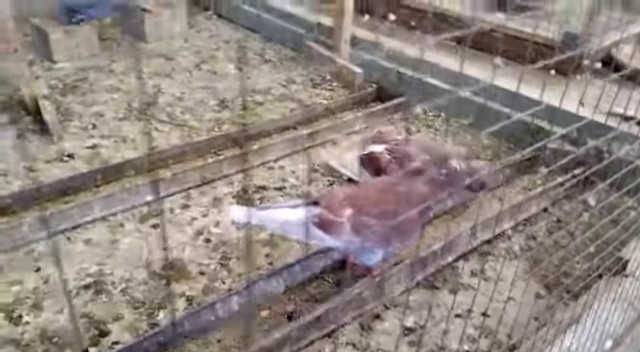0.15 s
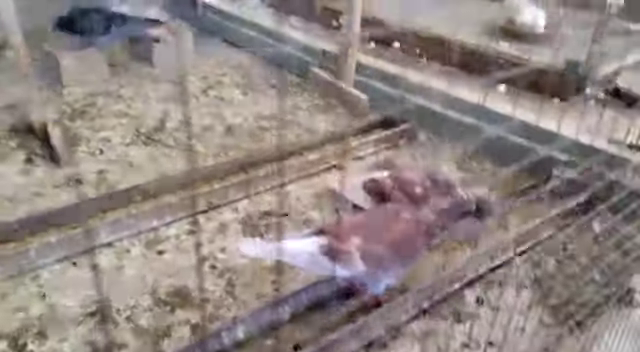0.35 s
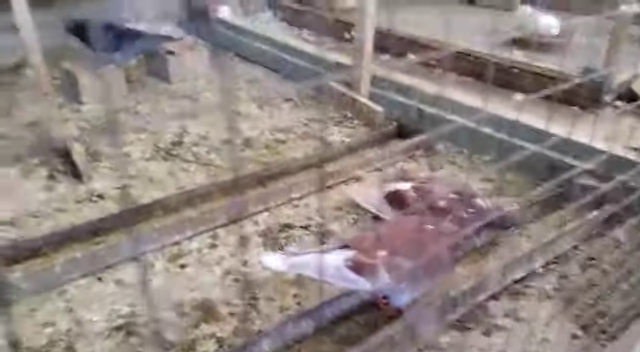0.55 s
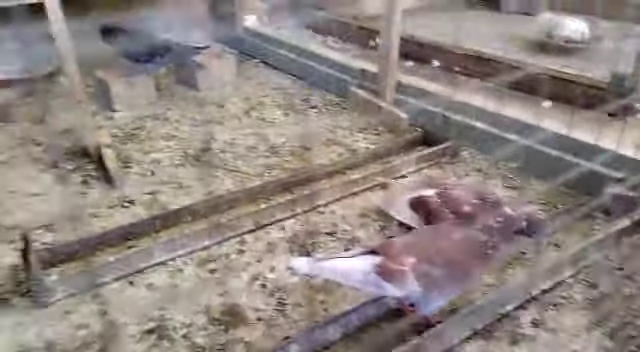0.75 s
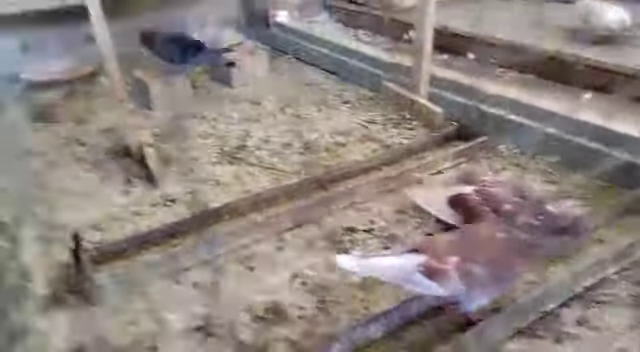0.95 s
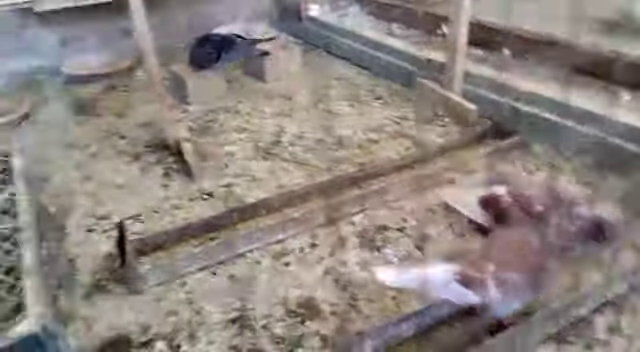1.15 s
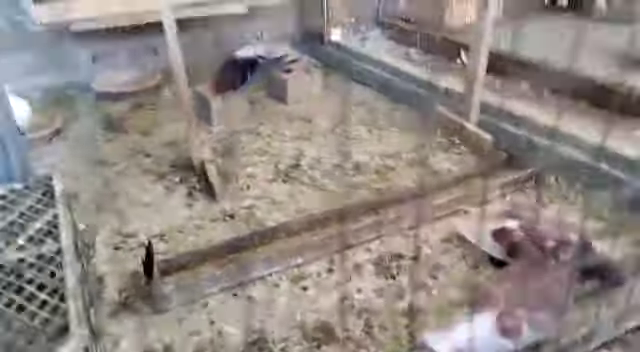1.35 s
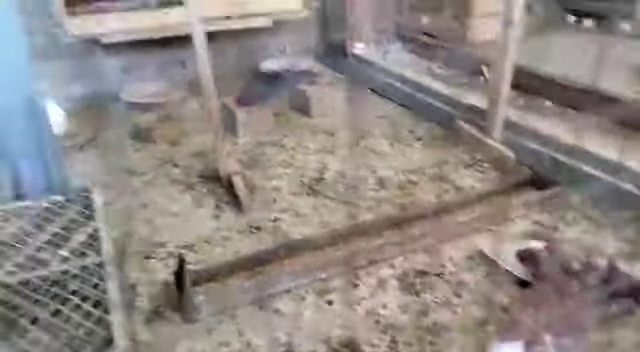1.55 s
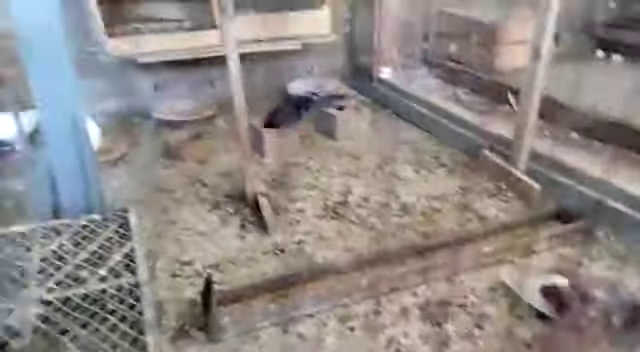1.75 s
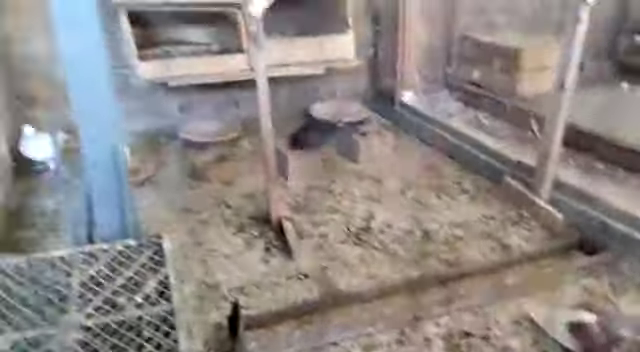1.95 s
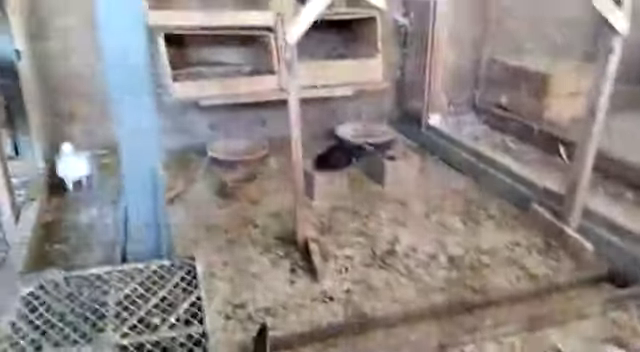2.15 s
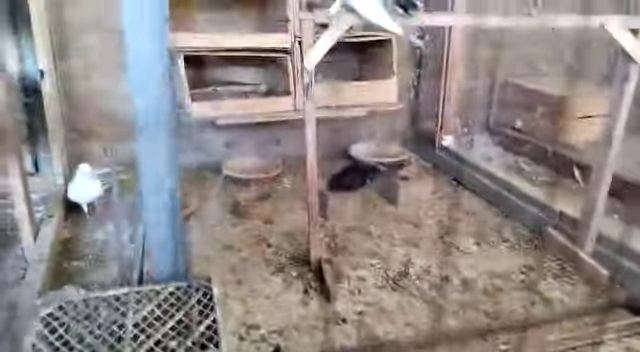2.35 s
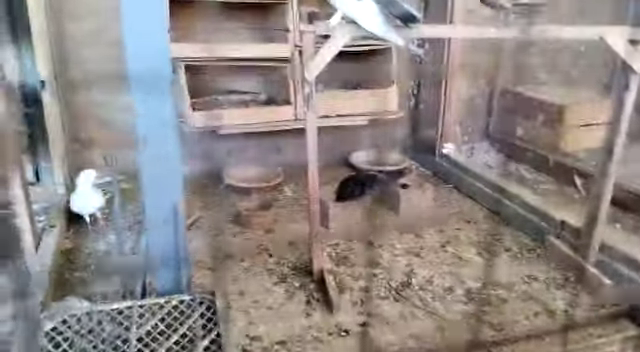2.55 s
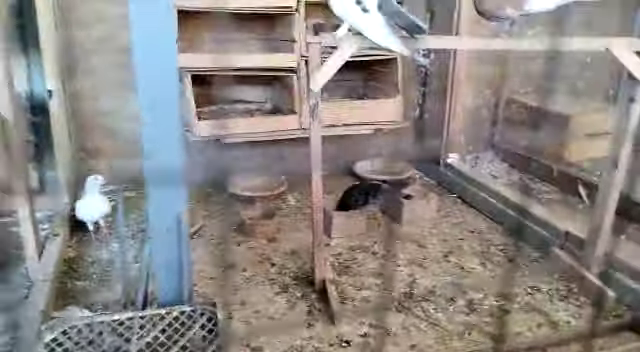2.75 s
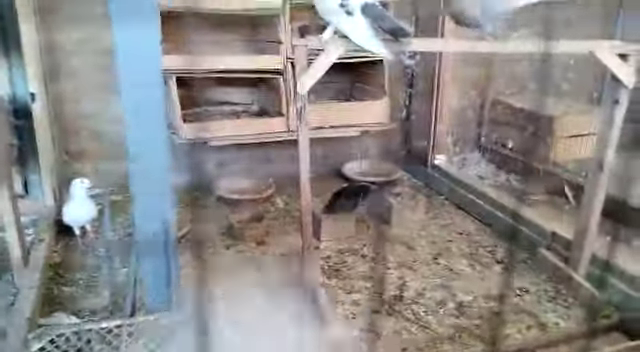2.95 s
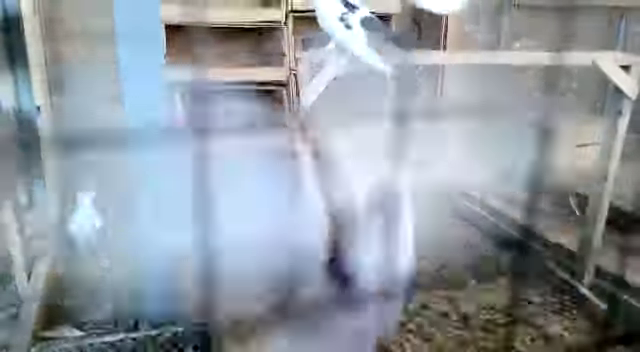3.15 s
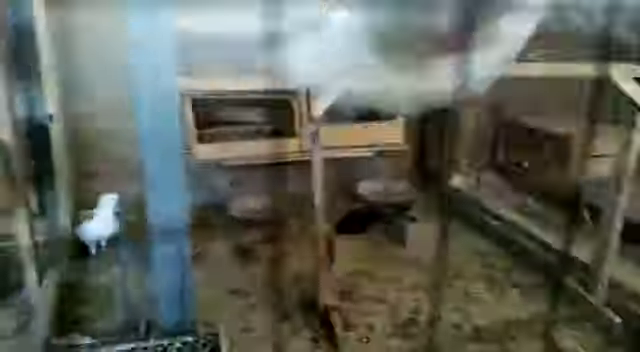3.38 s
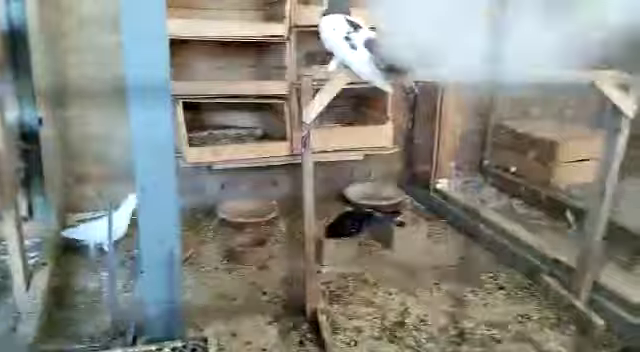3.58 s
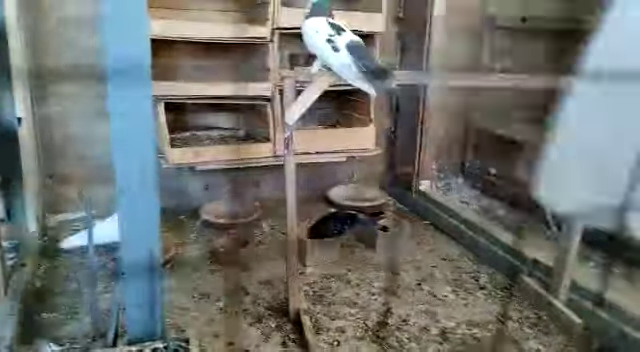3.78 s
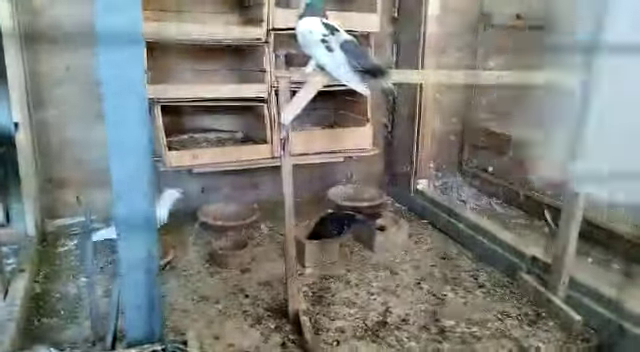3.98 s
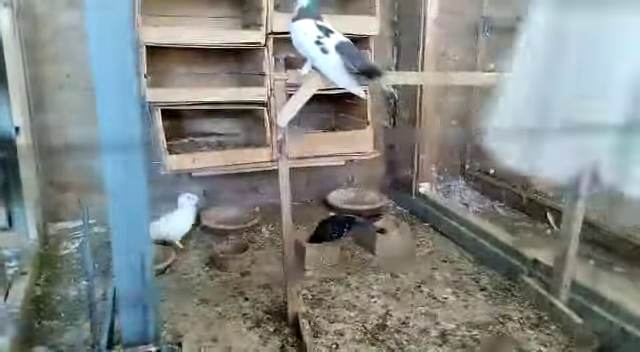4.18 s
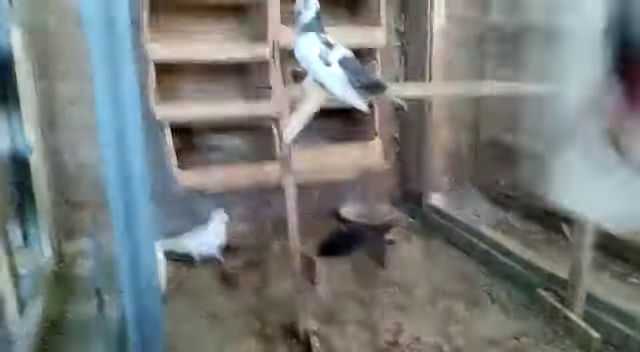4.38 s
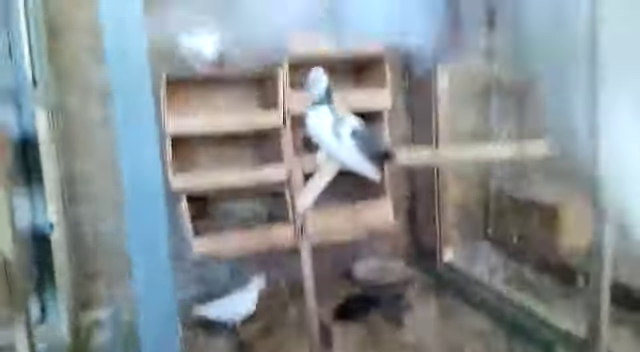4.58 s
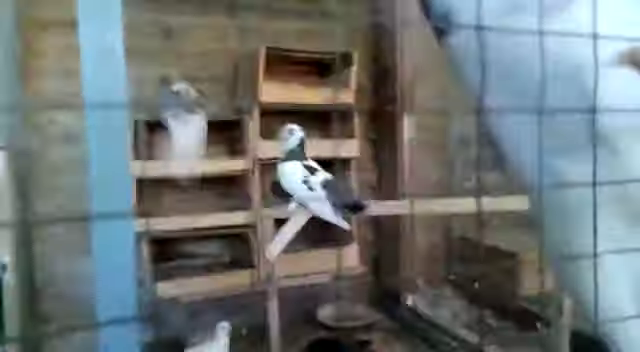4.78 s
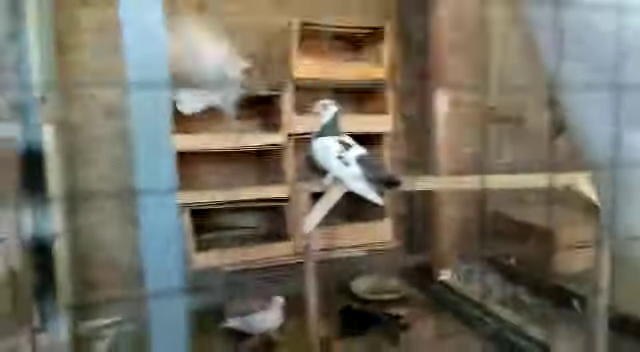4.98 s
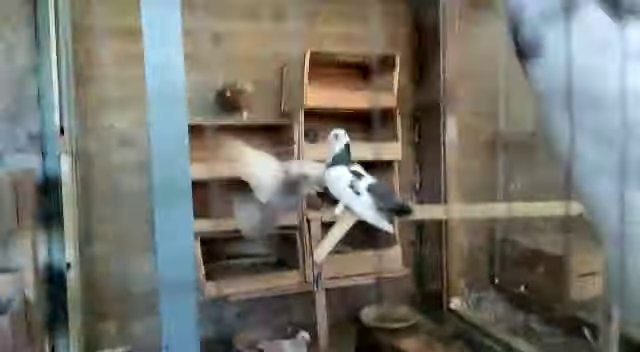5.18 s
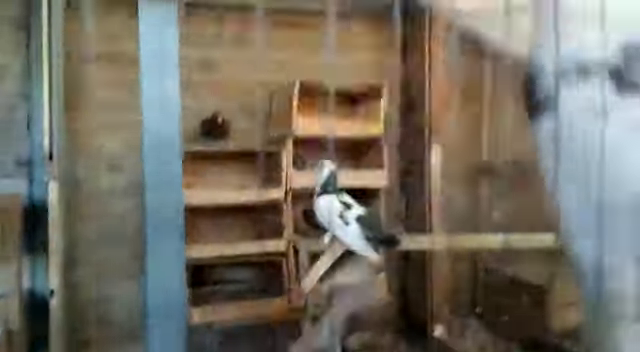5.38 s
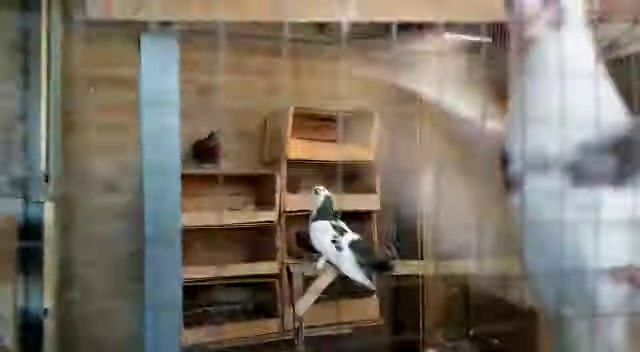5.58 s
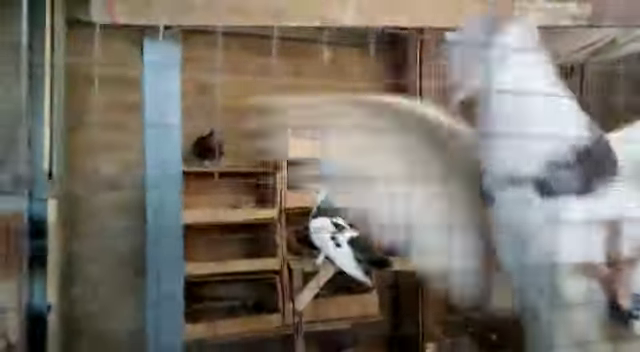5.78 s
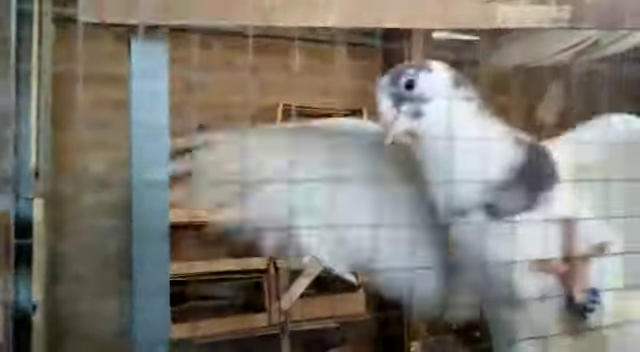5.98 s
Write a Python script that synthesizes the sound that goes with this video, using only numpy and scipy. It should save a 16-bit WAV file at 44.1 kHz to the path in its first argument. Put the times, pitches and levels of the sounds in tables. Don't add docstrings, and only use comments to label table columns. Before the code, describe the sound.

Pigeons patter and peck on gritty boards before one flaps hard at the wire very close by, slows, then lands two last sharp claps.

```python
import sys
import numpy as np
from scipy import signal
from scipy.fft import rfft, irfft
from scipy.io import wavfile
from scipy.ndimage import uniform_filter1d

SR = 44100
rng = np.random.default_rng(int(sys.argv[2]) if len(sys.argv) > 2 else 0)


def makeup_ratio(level_db):
    decades = np.asarray(level_db, float) / 20
    return 10 ** decades


def bounce(signal):
    frames = np.transpose(np.atleast_2d(signal))
    limited = np.clip(frames, -1, 1)
    pcm = np.round(limited * 32767).astype(np.int16)
    wavfile.write(sys.argv[1], SR, pcm)


N = 265923

# t/s, level/dB, distance/m
BUSTLE = [(0.0, -50, 3), (0.17, -51, 1.8), (1.33, -56, 14), (1.64, -54, 0.77), (2.97, -56.5, 3.6),
          (3.17, -46, 1.2), (3.29, -29, 2.5), (3.39, -30, 2.6), (3.66, -38, 1.5), (3.81, -37, 4.8),
          (4.03, -41.5, 2.5), (4.59, -38.5, 4.1), (4.8, -39, 2.1), (5.12, -39, 2.5), (5.41, -43, 3.3),
          (5.54, -33.5, 3.8), (5.78, -47, 1.6), (6.03, -48, 1.4)]


def curve(table):
    s, *columns = np.transpose(table)
    return [np.interp(np.arange(N) / SR, s, c) for c in columns]


def unit(x):
    return x / np.sqrt(np.mean(x ** 2))


def response(points, size=4096):
    hz, db = np.transpose(points)
    grid = np.maximum(np.arange(size // 2 + 1) * SR / size, 1)
    cepstrum = irfft(np.interp(np.log(grid), np.log(hz), db) * np.log(10) / 20)
    cepstrum[1:size // 2] *= 2
    cepstrum[size // 2 + 1:] = 0
    return irfft(np.exp(rfft(cepstrum)))


def band(x, lo_hz, hi_hz, order=3):
    return signal.sosfilt(signal.butter(order, [lo_hz, hi_hz], "band", fs=SR, output="sos"), x)


def walk(rate):
    k = int(SR / rate)
    held = np.repeat(rng.standard_normal(N // k + 1), k)
    return unit(uniform_filter1d(uniform_filter1d(held, k), k)[:N])


def crackle(spread_db):
    sizes = makeup_ratio(spread_db * rng.exponential(size=N).clip(0, 5))
    return unit(rng.standard_normal(N) * sizes)


def voiced(source, body, middle, edge):
    # f/Hz, level/dB
    mic_port = [(180, -12.5), (300, -10.5), (462, -13.5), (602, -9), (1230, -9.5), (1580, -6.5),
                (2630, -4.5), (3700, -3), (4330, -8.5), (5050, -1.5), (7870, 4.5), (10100, -3.5),
                (12100, -16), (15800, -23.5)]
    early = 256
    port = rfft(np.roll(response(mic_port), early))
    octave = np.log2(np.linspace(1, SR / 2, len(port)))
    above_body, above_edge = (1 / (1 + np.exp(-9 * (octave - np.log2(hz)))) for hz in (4500, 11000))
    shares = (1 - above_body, above_body - above_edge, above_edge)
    out = 0
    for env, share in zip((body, middle, edge), shares):
        h = irfft(port * share)
        h = h / np.sqrt(np.sum(h ** 2))
        out = out + signal.fftconvolve(source * env, h)[early:N + early]
    return out


def wing_claps():
    # t/s, peak/dB, crackle length/ms, distance/m, body share/dB
    clap_table = [(1.724, -15.5, 5.1, 0.13, -14), (1.742, -24.5, 6.4, 1.1, -5.5),
                  (3.1492, -6, 2.6, 0.2, -7.5), (3.26, -1, 4.7, 0.64, -4), (3.3759, -3.5, 2, 0.85, -5),
                  (3.4918, -11, 2.7, 1.4, -8), (3.5465, -10.5, 2.05, 0.23, -4), (4.0018, -25, 4, 0.27, -21),
                  (4.087, -26.5, 10, 2.3, -9.5), (4.2525, -21, 8.1, 1.4, -6), (4.3899, -17, 8, 1.3, -11),
                  (4.4358, -19.5, 3, 2.5, -23), (4.669, -18.5, 11, 1.9, -11), (4.805, -19.5, 5.9, 2.4, -10),
                  (4.828, -24, 6.8, 0.5, 0.5), (4.947, -17, 11, 1.9, -9), (5.1183, -36, 3.6, 9.5, -7.5),
                  (5.1756, -17, 4.5, 1.3, -12), (5.4, -25, 3.7, 3.7, -5), (5.523, 1.5, 3.9, 1.1, -9),
                  (5.6442, 2.5, 3.9, 1.07, -9.5)]
    edge_db = -9.5
    return [(*row, edge_db) for row in clap_table]


def quill_catches():
    # t/s, peak/dB, distance/m
    catch_table = [(3.123, -12.5, 1.1), (3.3168, -3, 0.12), (3.5132, -4.5, 0.4), (3.5376, 2, 0.17),
                   (3.6806, -7, 0.41), (3.7774, -12, 1.6), (4.1594, -20, 1.1), (4.4525, -12, 2),
                   (4.7632, -20, 0.65), (5.865, -24.5, 0.88), (5.878, -33, 0.49)]
    body_db, edge_db = -15, -22
    return [(s, db, 0.8, m, body_db, edge_db) for s, db, m in catch_table]


def pecks():
    # t/s, peak/dB
    peck_table = [
        (1.8574, -25.5),
        (1.932, -26.5),
        (2.7367, -24.5),
        (3.4287, -16),
    ]
    length_ms, distance_m, body_db, edge_db = 0.8, 0.58, -13, -8
    return [(s, db, length_ms, distance_m, body_db, edge_db) for s, db in peck_table]


def claw_ticks():
    # t/s, peak/dB, body share/dB
    tick_table = [(0.194, -39, -1), (0.4096, -24.5, -5.5), (0.6916, -38, -9), (0.815, -26.5, -30),
                  (0.832, -31, -9), (0.9605, -38, -10), (1.052, -33, -20), (1.0635, -32.5, -8),
                  (1.313, -33, -9), (1.551, -35, -25), (1.68, -33, -8), (1.703, -31, -8), (2.043, -38, -28),
                  (2.228, -33, -25), (1.955, -36, -20), (2.2166, -27.5, -10), (2.2626, -33, -17),
                  (2.314, -31, -4), (2.358, -30, -9), (2.4964, -25, -12), (2.578, -29, -22),
                  (2.8904, -23, -14), (2.908, -31, -15), (2.931, -31.5, -25), (3.0105, -28.5, -14),
                  (3.03, -39, -13), (2.785, -36, -4), (2.808, -40, -6), (3.045, -36, -2), (2.6, -37, -4)]
    length_ms, distance_m, edge_db = 0.8, 0.57, -13
    return [(s, db, length_ms, distance_m, body_db, edge_db) for s, db, body_db in tick_table]


def contacts():
    room_at_1m_db, dull_db_per_doubling = -16.5, 2
    brightens = 0.15
    t60_s = np.array([[0.29], [0.29 * 0.85], [0.17]])
    direct, room = np.zeros((3, N)), np.zeros((3, N))
    t = np.arange(SR // 2) / SR
    for s, db, ms, m, body_db, edge_db in wing_claps() + pecks() + claw_ticks() + quill_catches():
        room_db = room_at_1m_db + 20 * np.log10(m)
        edge_db = edge_db - dull_db_per_doubling * np.log2(m) + brightens * max(db + 8, 0)
        share = makeup_ratio(db + np.array([[body_db], [0], [edge_db]]))
        i = int(s * SR)
        n = min(len(t), N - i)
        u = t[:n] / (ms / 1000)
        direct[:, i:i + n] += share ** 2 * (1 - np.exp(-u / 0.7)) * np.exp(-2 * u ** 0.68)
        tail = share * makeup_ratio(room_db - 60 * t[:n] / t60_s)
        room[:, i:i + n] += tail ** 2 * (1 - np.exp(-t[:n] / 0.0037))
    barbs = rng.choice([-1., 1.], N) * makeup_ratio(0.35 * walk(900))
    scatter = crackle(1.3)
    return makeup_ratio(-4.0) * (voiced(barbs, *np.sqrt(direct)) + voiced(scatter, *np.sqrt(room)))


def barb_snaps():
    # t/s, peak/dB
    snap_table = [(3.1497, -4.5), (3.235, -20), (3.2605, -9), (3.3172, -2.5), (3.3768, -4), (3.4305, -5),
                  (3.465, -12.5), (3.655, -17), (3.669, -13), (3.6705, -7), (3.672, -8), (3.6738, -8),
                  (3.6768, -3.5), (3.6808, 0.5), (3.6835, -14), (3.686, -12), (3.689, -15), (3.4922, -12),
                  (3.494, -13), (3.4955, -14), (3.5425, -10), (3.548, -7), (3.5495, -10), (3.552, -15),
                  (3.761, -26), (3.7745, -10.5), (3.78, -16), (3.846, -20), (4.0205, -21), (4.1416, -25),
                  (4.1625, -16), (4.211, -20), (4.282, -23), (4.3192, -32), (4.3471, -27), (4.4555, -5.5),
                  (4.5035, -15), (4.545, -17), (4.559, -17), (4.57, -21), (4.64, -22), (4.7645, -17),
                  (4.6766, -14), (4.2011, -21), (3.9278, -27), (4.9505, -11), (4.9074, -23), (4.9233, -23),
                  (4.955, -5), (4.974, -8), (5.1618, -26), (5.292, -27), (5.3264, -33), (5.5225, -6),
                  (5.5245, -4), (5.5258, -2), (5.5498, -10), (5.551, -14)]
    body_db, edge_db = -13, -5
    brightens = 0.5
    click = np.zeros((3, N))
    for (s, db), (sign, lag) in zip(snap_table, rng.random((len(snap_table), 2))):
        size = np.sign(sign - 0.5) * makeup_ratio(db + 4.5 + np.array([body_db, 0, edge_db + brightens * db]))
        echo_s = 0.0002 + 0.0006 * lag
        click[:, int(s * SR)] += size
        click[:, int((s + echo_s) * SR)] += 0.46 * size
    return voiced(0.9, *click)


def rings():
    # t/s, peak/dB, f/Hz, t60/ms
    ring_table = [(3.262, -18, 2420, 47), (3.376, -18.5, 3080, 38), (3.3765, -21, 2090, 26),
                  (3.3765, -15, 3890, 27), (3.465, -26.5, 3400, 60), (4.748, -39, 3320, 70),
                  (4.772, -38, 3550, 50), (4.762, -34, 3300, 44), (4.802, -38, 3500, 36),
                  (4.826, -30, 3240, 70), (4.842, -36, 3100, 60), (4.83, -31, 7000, 99),
                  (4.9, -42, 3180, 60), (4.925, -31, 3030, 50), (5.175, -35, 1600, 40),
                  (5.178, -41, 2960, 60), (5.215, -50, 3600, 120), (5.325, -39, 2400, 54),
                  (5.345, -52, 3420, 90), (5.397, -37, 1134, 87), (5.345, -42, 722, 200),
                  (5.522, -31, 1150, 120), (5.42, -41, 3970, 92), (5.44, -33.5, 608, 110),
                  (5.5223, -19, 1593, 59), (5.5228, -11.5, 3980, 35), (5.524, -13, 10200, 40),
                  (5.525, -26, 2820, 94), (5.6455, -16, 1640, 45), (5.6447, -18.5, 2414, 46),
                  (5.6445, -9, 3560, 32), (2.59, -58, 2760, 80), (.727, -54, 1980, 45),
                  (.782, -47.5, 950, 40), (0.003, -48, 1920, 70), (.288, -58, 3200, 60),
                  (.374, -53, 3200, 50), (.325, -57, 910, 66), (1.567, -49, 967, 130),
                  (4.255, -41, 3200, 60), (5.72, -36.5, 293, 130), (5.795, -51, 850, 120),
                  (5.86, -50, 900, 70), (5.925, -49, 780, 110), (5.986, -57, 880, 70)]
    swell_ms = 1.2
    out, t = np.zeros(N + SR), np.arange(SR // 5) / SR
    wander = np.resize(walk(250), N + SR)
    flutter = np.resize(makeup_ratio(2.5 * walk(400)), N + SR)
    for s, db, hz, ms in ring_table:
        i = int(s * SR)
        here = slice(i, i + len(t))
        shape = makeup_ratio(db - 60000 * t / ms) * (1 - np.exp(-1000 * t / swell_ms))
        out[here] += shape * flutter[here] * np.sin(2 * np.pi * hz * t + wander[here])
    return out[:N]


def draught():
    # t/s, depth/dB, half width/ms
    gust_table = [(.004, -34, 9.2), (0.024, -32, 4.9), (3.195, -41, 7.9), (3.567, -22, 4.6),
                  (3.162, -45, 8.2), (3.231, -18.5, 18), (3.268, -17.5, 3.3), (3.31, -33, 5.5),
                  (3.338, -17, 3.1), (3.384, -16.5, 22), (3.452, -13.5, 3.8), (3.496, -16, 6.3),
                  (3.545, -10, 7.2), (3.612, -30, 17), (3.671, -16, 9.3), (3.826, -21, 27),
                  (4.151, -27.5, 9), (4.175, -28, 4.1), (5.357, -31.5, 10), (5.463, -27.5, 7.7),
                  (5.646, -31.5, 10)]
    # t/s, turbulence/dB
    turbulence = [(0, -44), (.1, -55.5), (1.4, -59), (3.08, -60), (3.17, -35.5), (3.66, -38.5), (3.76, -48),
                  (3.83, -38), (3.92, -50), (4.17, -46.5), (4.35, -45.5), (4.52, -43), (4.68, -48),
                  (5.27, -50), (5.36, -40), (5.7, -49), (5.82, -52.5), (6.03, -54.5)]
    buffet_db = curve(turbulence)[0]
    whoosh_db = -47.5 + 0.95 * (buffet_db + 40)
    t = np.arange(N) / SR
    pull = sum(-makeup_ratio(db) * np.exp(-((t - s) * 1000 / ms) ** 2) for s, db, ms in gust_table)
    pull = pull - uniform_filter1d(pull, int(0.07 * SR))
    lurch = unit(band(rng.standard_normal(N), 5.3, 97, order=2)) * makeup_ratio(2.5 * walk(12))
    whoosh = unit(band(crackle(2.0), 150, 800, order=2)) * makeup_ratio(2.5 * walk(25))
    return pull + makeup_ratio(buffet_db) * lurch + makeup_ratio(whoosh_db) * whoosh


def wing_swishes():
    # peak t/s, level/dB, rise/ms, fall/ms, body share/dB
    swish_table = [(3.132, -31, 12, 33, -13), (3.2, -33.5, 48, 210, -5.5), (3.43, -19, 3.7, 3.7, -12.5),
                   (3.47, -30, 11, 15, -4.5), (3.607, -35, 22, 20, -8), (3.65, -29, 6.8, 10, -13),
                   (3.674, -22, 7, 14.8, -14.5), (3.784, -29, 8.9, 9.4, -29), (3.828, -30.5, 38, 25.5, -9),
                   (3.934, -43.5, 13, 30, -7.5), (4.023, -37, 4, 7, -10), (4.155, -36.5, 16, 16, -20),
                   (4.21, -36.5, 36, 24, -8), (4.37, -40, 22, 8.1, -11), (4.457, -26, 6, 7, -15),
                   (4.48, -32, 12, 20, -15), (3.352, -30, 14, 12, -8), (3.29, -32, 8, 12, -8),
                   (3.52, -29, 8, 8, -10), (4.552, -29, 40, 41, -11), (4.68, -38, 30, 12, -23),
                   (4.765, -37.5, 12, 19, -4.5), (4.911, -40, 5.3, 6, -7), (4.929, -28, 5, 9, -14),
                   (4.956, -19.5, 8, 32, -12), (4.995, -30, 17, 33, -15), (5.225, -45.5, 25, 12, -3),
                   (5.343, -39, 17, 48, -5), (5.43, -37.5, 29, 40, -4)]
    edge_db = -12.5
    return [(*row, edge_db) for row in swish_table]


def litter_shuffles():
    # peak t/s, level/dB, rise/ms, fall/ms
    shuffle_table = [(0.004, -50.5, 8, 11), (0.034, -49, 11, 16), (.205, -53, 8, 11), (.322, -66, 5.5, 8),
                     (.11, -55, 6, 7.9), (.155, -52, 5.9, 7.5), (.415, -48, 9.3, 9), (.435, -52, 13, 10),
                     (.475, -52.5, 14, 15), (.52, -52.5, 13, 16), (.595, -56, 13, 15), (.76, -57, 32, 21),
                     (.835, -50, 16, 40), (1.21, -57, 46, 61), (1.36, -56.5, 35, 51), (1.57, -52.5, 39, 61),
                     (2.114, -54, 31, 51), (2.51, -51, 15, 49), (2.6, -51, 16, 19), (2.745, -52.5, 34, 57),
                     (3.035, -53, 32, 9), (5.871, -52, 23, 9), (5.942, -50.5, 11, 11)]
    body_db, edge_db = -8.5, -10
    strokes = []
    for s, db, rise, fall in shuffle_table:
        bright_db = 1.95 * (db + 52)
        strokes.append((s, db, rise, fall, body_db + bright_db, edge_db + bright_db))
    return strokes


def rustle():
    db, m = curve(BUSTLE)
    bed_edge_db = -1 - 3.5 * m
    power = makeup_ratio(db - 6.5 + np.array([-7.5 + 0 * db, 0 * db, bed_edge_db])) ** 2
    t = np.arange(N) / SR
    for s, stroke_db, rise, fall, body_db, edge_db in wing_swishes() + litter_shuffles():
        u = (t - s) * 1000 / np.where(t < s, rise, fall)
        share = makeup_ratio(stroke_db + np.array([[body_db], [0], [edge_db]]))
        power = power + share ** 2 * np.exp(-u ** 2)
    together = 0.5 * walk(40) + 1.36 * walk(120) + 1.15 * walk(350)
    alone = np.array([1.36 * walk(37), 0.2 * walk(6.5), 1.1 * walk(4.2)])
    flicks = 1.2 * rng.uniform(-1.7, 1.7, N) * (rng.random(N) < 120 / SR)
    return voiced(crackle(1.84) + flicks, *np.sqrt(power) * makeup_ratio(together + alone))


def board_knocks():
    # t/s, peak/dB, f/Hz
    knock_table = [(1.567, -50, 765), (3.124, -56, 1480), (3.257, -25.5, 1390), (3.315, -39, 680),
                   (3.376, -48, 1930), (3.429, -31.5, 426), (3.461, -32, 736), (3.491, -32.5, 970),
                   (3.578, -46, 684), (3.636, -49, 625), (3.671, -34, 467), (3.799, -43, 724),
                   (4.259, -43, 1720), (4.749, -41.5, 805), (4.947, -36, 1960), (5.178, -42, 1015),
                   (5.219, -50, 650), (5.331, -40.5, 855), (5.399, -42, 656), (5.645, -37, 1530)]
    t60_s = 0.057
    out, t = np.zeros(N + SR), np.arange(SR // 4) / SR
    for (s, db, hz), spread in zip(knock_table, rng.uniform(0.444, 1.6, (len(knock_table), 5))):
        i = int(s * SR)
        ring = np.sin(2 * np.pi * hz * t)
        ring = ring + np.sin(2 * np.pi * hz * spread[:, None] * t).sum(axis=0)
        out[i:i + len(t)] += makeup_ratio(db - 2.0 - 60 * t / t60_s) * ring * (1 - np.exp(-t / 0.0015))
    return out[:N]


def crumbs():
    # t/s, peak/dB, f/Hz
    crumb_table = [(0.1411, -49, 1850), (0.195, -43.5, 1690), (0.2506, -41, 1730), (0.345, -43.5, 1620),
                   (0.412, -50, 2060), (0.476, -43, 1010), (0.5087, -47, 1770), (0.534, -41.5, 1740),
                   (0.568, -46, 1030), (0.604, -46, 1620), (0.696, -50, 918), (0.7275, -46, 1050),
                   (0.833, -39.5, 1500), (0.865, -43, 790), (0.967, -49, 810), (0.99, -50, 700),
                   (1.0994, -46.5, 1440), (.603, -50, 2060), (.639, -46, 1050), (.922, -45, 751),
                   (1.528, -53, 789), (1.723, -38, 2950), (1.7456, -37, 2200), (1.8574, -49, 1290),
                   (1.929, -51, 1520), (2.191, -39, 1200), (2.205, -45, 900), (2.2733, -49, 1510),
                   (2.4407, -50, 894), (2.498, -46, 1900), (2.5, -50, 2640), (2.315, -47, 900),
                   (2.555, -47, 900), (2.9612, -53, 1310), (3.042, -42, 1100)]
    when, pitch, size = rng.random((800, 3)).T
    grit_db = (-42 + 0.7 * (curve(BUSTLE)[0] + 40))[(when * N).astype(int)]
    grit = zip(when * N / SR, grit_db - 3.0 - 14 * size ** 0.5, 600 * 4.5 ** pitch)
    out, t = np.zeros(N + SR), np.arange(SR // 40) / SR
    tumble = np.resize(1.32 * walk(700), N + SR)
    for s, db, hz in list(crumb_table) + list(grit):
        i = int(s * SR)
        roll = tumble[i:i + len(t)]
        ring = np.sin(2 * np.pi * hz * t + roll) + 0.55 * np.sin(2 * np.pi * 0.58 * hz * t - roll)
        out[i:i + len(t)] += makeup_ratio(db - 3.0 - 60 * t / 0.016) * ring
    return out[:N]


def gliding_tones(tones, overtones_db):
    out, waver, flutter = np.zeros(N), walk(130), makeup_ratio(3.5 * walk(300))
    for s, length, hz, db, glide in tones:
        i, u = int(s * SR), np.linspace(0, 1, int(length * SR))
        here = slice(i, i + len(u))
        bend = glide * (u - 0.5) + (0.006 + 0.3 * abs(glide)) * waver[here]
        phase = 2 * np.pi * np.cumsum(hz * (1 + bend)) / SR
        tone = np.sin(phase) + makeup_ratio(overtones_db) * (np.sin(2 * phase) + 0.6 * np.sin(3 * phase))
        out[here] += makeup_ratio(db) * flutter[here] * np.sqrt(np.sin(np.pi * u).clip(0)) * tone
    return out


def wing_creaks():
    # t/s, length/s, f/Hz, level/dB, glide share of f
    creak_table = [(3.17, 0.0337, 749, -34.5, 0.16), (5.212, 0.036, 653, -43, -0.091),
                   (5.324, 0.021, 795, -40.5, -0.04), (5.399, 0.034, 654, -38, -0.02),
                   (4.7, .022, 1310, -48, -.06), (5.437, 0.015, 690, -44, -.08),
                   (5.29, .02, 1000, -54, .03), (5.348, .014, 1200, -47, .1)]
    return gliding_tones(creak_table, overtones_db=-13)


def far_flight():
    start_s, beat_s, beat_ms = 1.976, 0.1178, 16.3
    t = np.arange(N) / SR
    beats = sum(makeup_ratio(2.5 * chance) * np.exp(-((t - start_s - k * beat_s) * 1000 / beat_ms) ** 2)
                for k, chance in enumerate(rng.standard_normal(10)))
    return makeup_ratio(-58.5) * beats * unit(band(crackle(2.8), 262, 810, order=2))


def far_chirps():
    # t/s, length/s, f/Hz, level/dB
    chirp_table = [(.05, .105, 3900, -65), (.3, 0.062, 4380, -67), (.685, .11, 5500, -66),
                   (2.62, 0.049, 3180, -59), (2.668, .032, 3180, -65), (2.715, .016, 3330, -65),
                   (2.76, .02, 1900, -65), (2.845, 0.028, 3510, -60), (2.874, .014, 4020, -66),
                   (2.892, 0.03, 2440, -63), (3.061, .014, 3220, -59), (3.078, 0.036, 3200, -56.5)]
    return gliding_tones([(*row, -0.006) for row in chirp_table], overtones_db=-30)


def far_hiss():
    # t/s, f/Hz, level/dB
    hiss_table = [(0, 4300, -69), (.9, 4300, -72), (1.12, 5200, -78), (1.16, 4500, -61),
                  (1.21, 4100, -60.5), (1.29, 3900, -62), (1.34, 4200, -71), (1.39, 5600, -66),
                  (1.44, 6000, -80), (2.37, 4300, -87), (2.4, 4390, -65), (2.47, 5300, -53),
                  (2.5, 5560, -74)]
    hz, db = curve(hiss_table)
    breath = signal.sosfilt(signal.butter(3, 1000, fs=SR, output="sos"), rng.standard_normal(N))
    return makeup_ratio(db) * unit(breath * np.sin(2 * np.pi * np.cumsum(hz) / SR))


def motor():
    # t/s, level/dB
    motor_level = [(0, -48.5), (1, -49), (2, -50), (2.2, -55), (3, -56), (4.5, -50), (6.03, -59)]
    # multiple of the base f, level/dB
    orders = [
        (.5, -10),
        (1, -0.5),
        (1.5, -12.5),
        (2, -16.5),
    ]
    phase = 2 * np.pi * np.cumsum(127.4 * (1 + 0.00796 * walk(6.7))) / SR
    drone = sum(makeup_ratio(db + 0.39 * walk(6.2)) * np.sin(k * phase) for k, db in orders)
    return makeup_ratio(curve(motor_level)[0]) * drone


def town():
    # f/Hz, level/dB
    town_spectrum = [(12, -9), (20, -11), (44, -2.5), (125, -0.5), (229, -7.5), (375, -18), (426, -20.5),
                     (732, -33), (900, -49), (1170, -60), (1980, -120)]
    level_db = -50.5 - 1.5
    rumble = unit(signal.fftconvolve(rng.standard_normal(N), response(town_spectrum, size=16384))[:N])
    return makeup_ratio(level_db) * rumble * makeup_ratio(0.8 * walk(6))


def scene():
    flying_bird = contacts() + barb_snaps() + rings() + draught() + rustle() + wing_creaks()
    floor = board_knocks() + crumbs()
    far = far_flight() + far_chirps() + far_hiss() + motor() + town()
    return (flying_bird + floor + far)[None]


def band_limit(x):
    return signal.sosfilt(signal.butter(12, 15850, fs=SR, output="sos"), x)


def record(dry):
    hiss = makeup_ratio(-74) * unit(band(rng.standard_normal(N), 9900, 16000, order=2))
    ceiling = 0.97
    rounded = ceiling * np.tanh(np.abs(dry / ceiling) ** 3) ** (1 / 3) * np.sign(dry)
    top_cut = signal.ellip(8, 0.2, 60, 16300, fs=SR, output="sos")
    return band_limit(signal.sosfilt(top_cut, rounded + hiss))


dry = scene()
out = record(dry)
bounce(out)
```